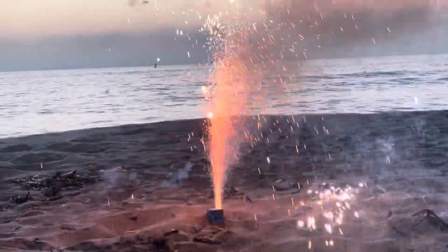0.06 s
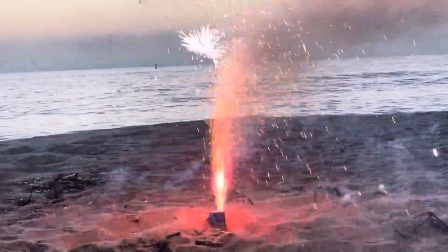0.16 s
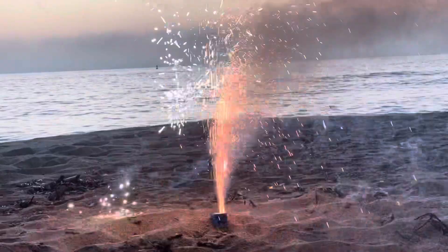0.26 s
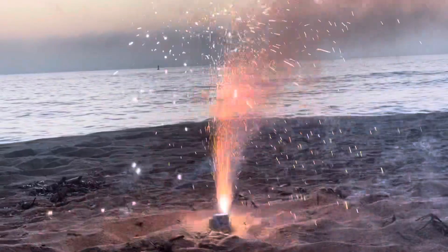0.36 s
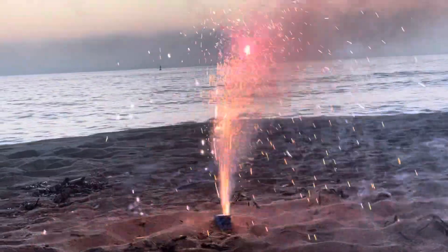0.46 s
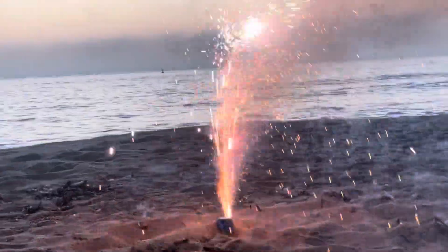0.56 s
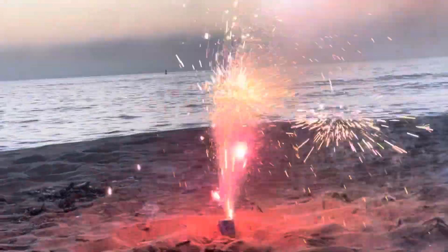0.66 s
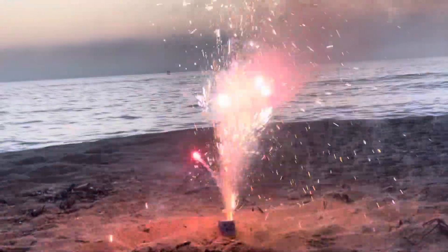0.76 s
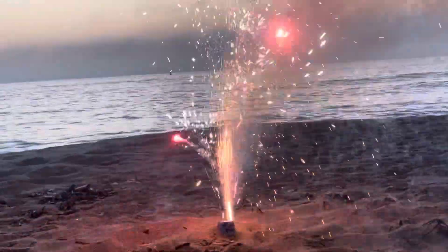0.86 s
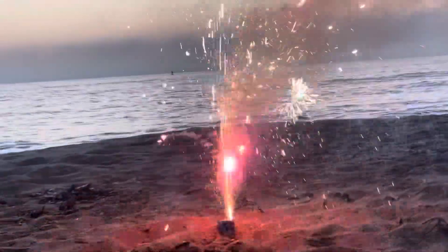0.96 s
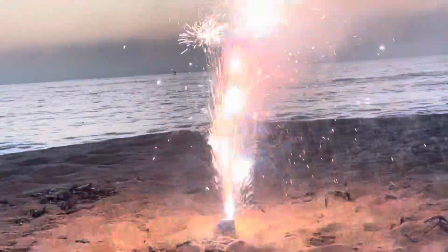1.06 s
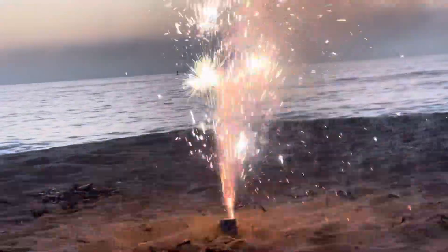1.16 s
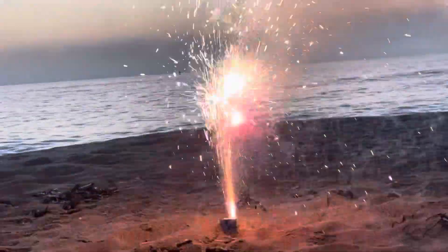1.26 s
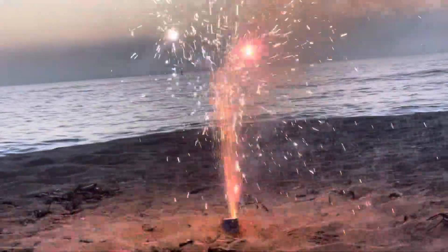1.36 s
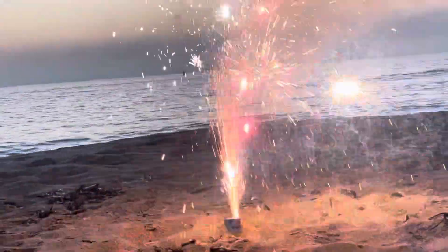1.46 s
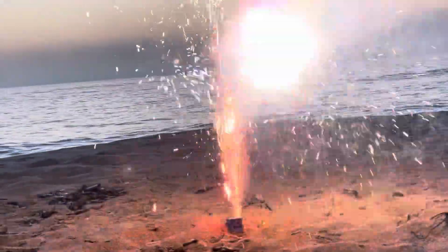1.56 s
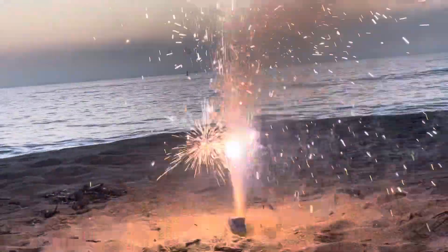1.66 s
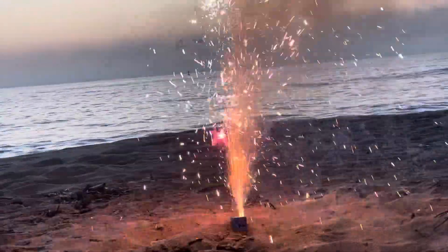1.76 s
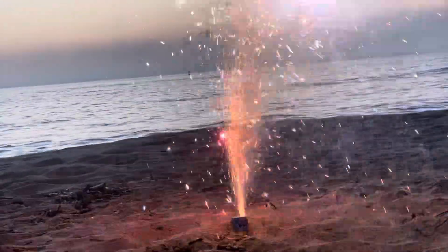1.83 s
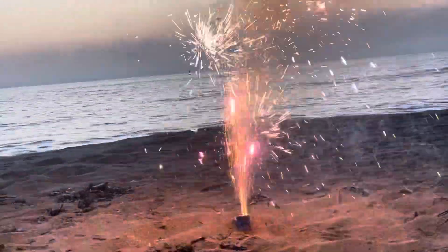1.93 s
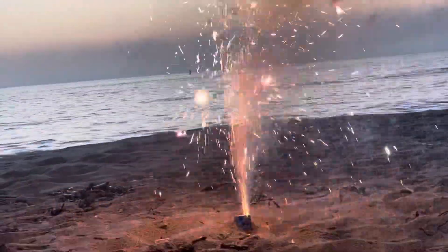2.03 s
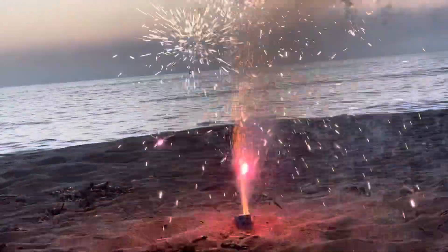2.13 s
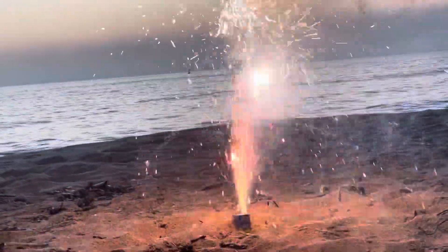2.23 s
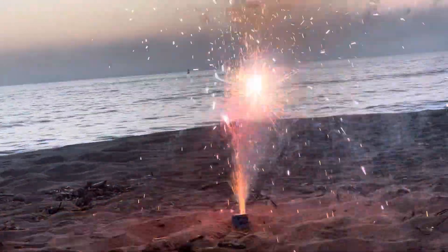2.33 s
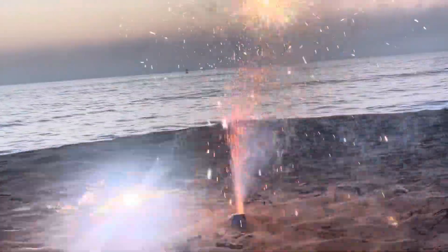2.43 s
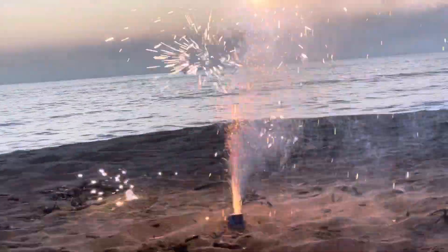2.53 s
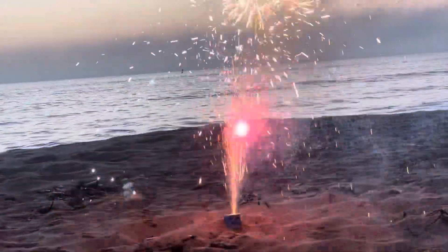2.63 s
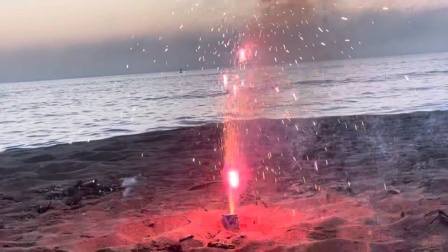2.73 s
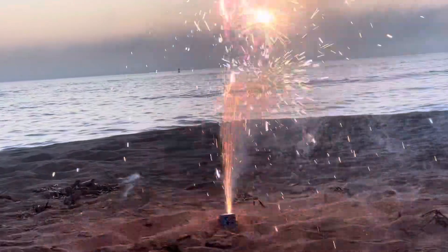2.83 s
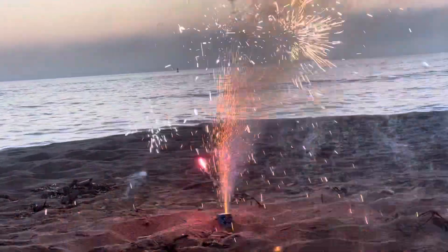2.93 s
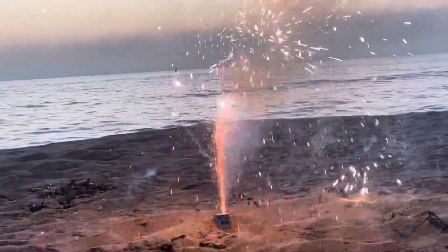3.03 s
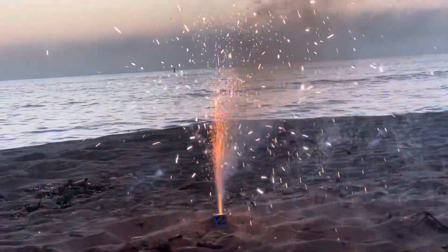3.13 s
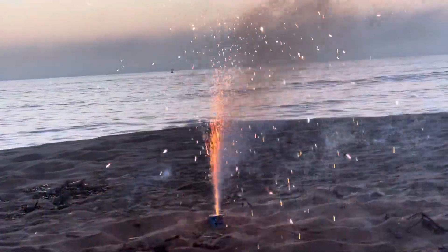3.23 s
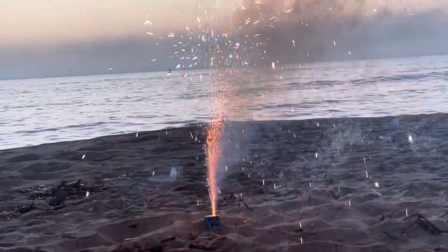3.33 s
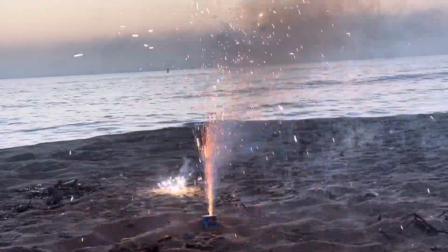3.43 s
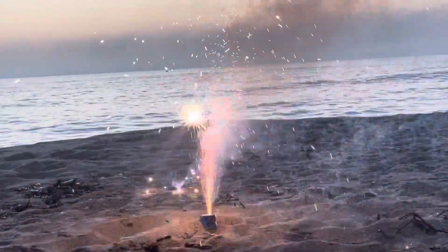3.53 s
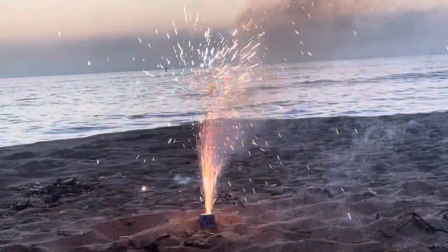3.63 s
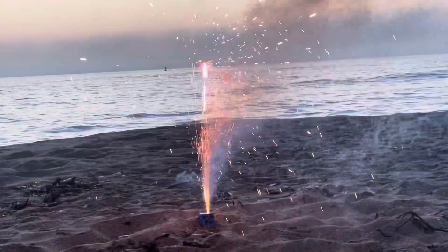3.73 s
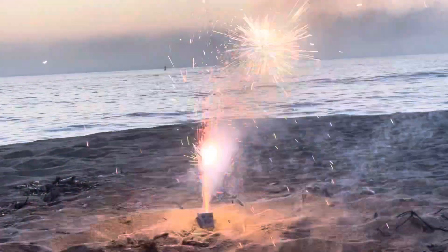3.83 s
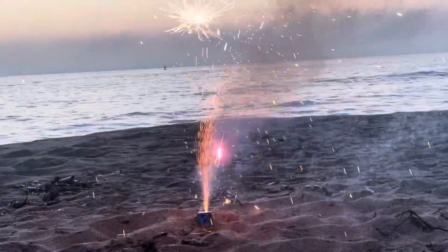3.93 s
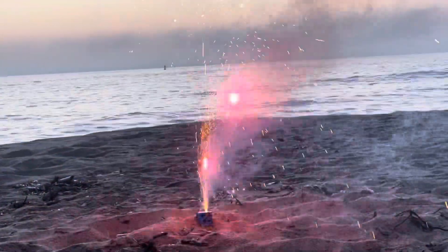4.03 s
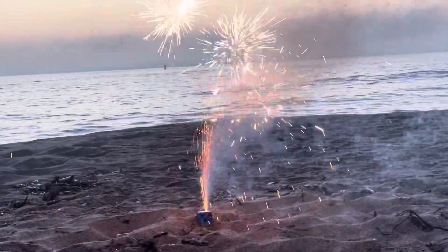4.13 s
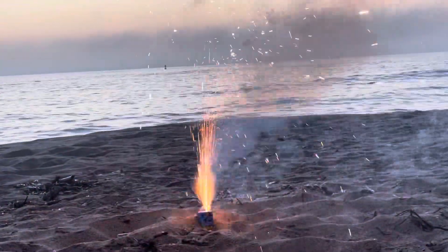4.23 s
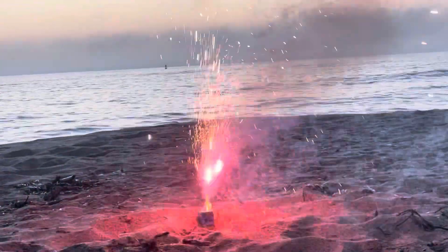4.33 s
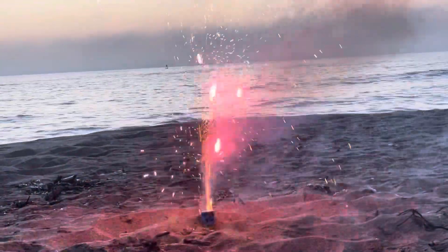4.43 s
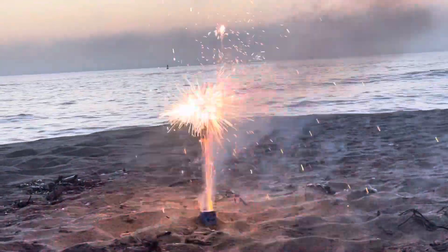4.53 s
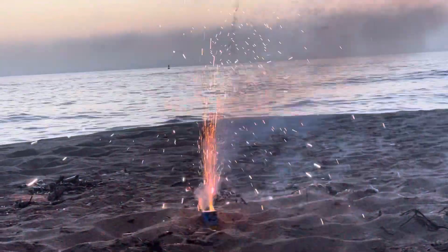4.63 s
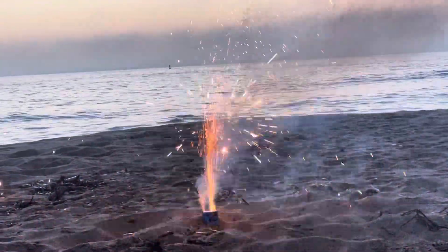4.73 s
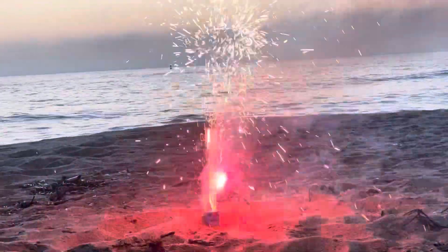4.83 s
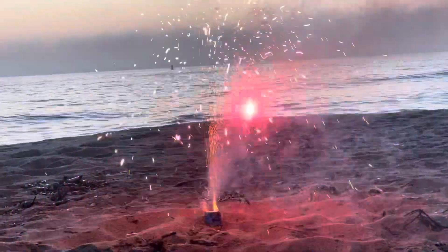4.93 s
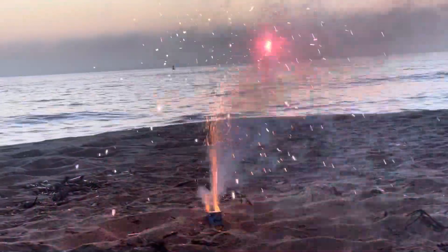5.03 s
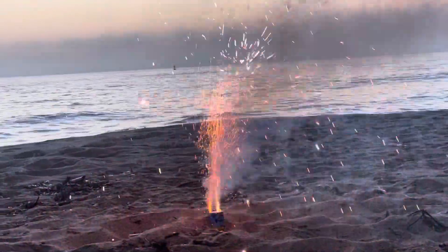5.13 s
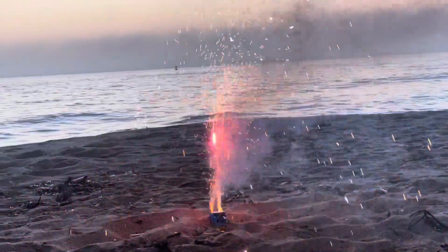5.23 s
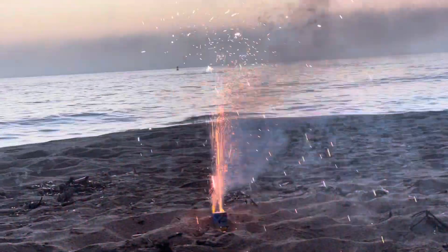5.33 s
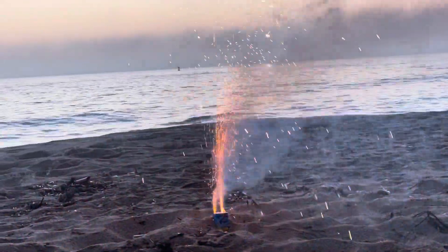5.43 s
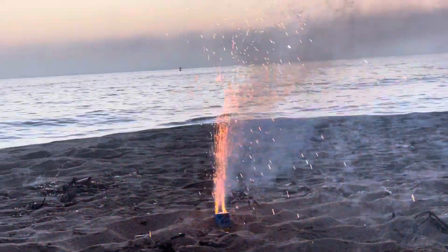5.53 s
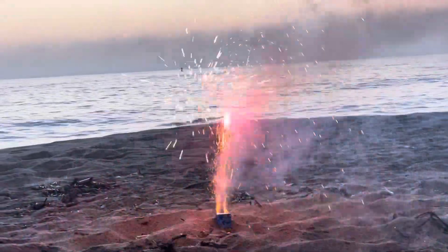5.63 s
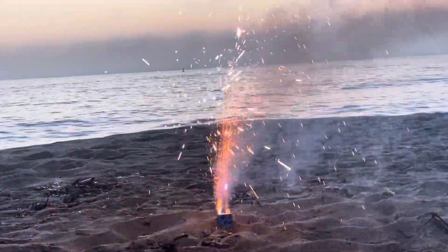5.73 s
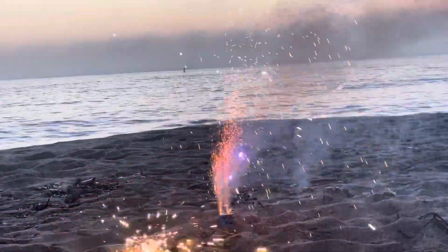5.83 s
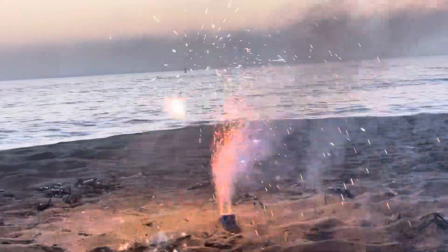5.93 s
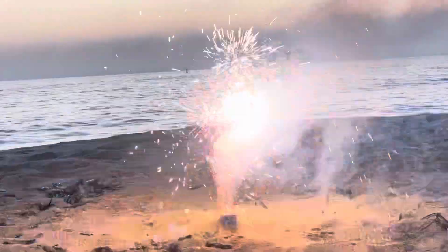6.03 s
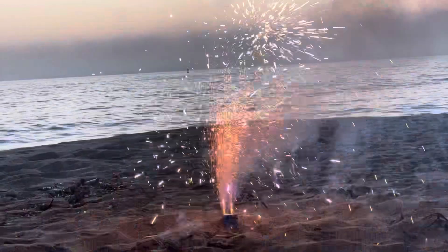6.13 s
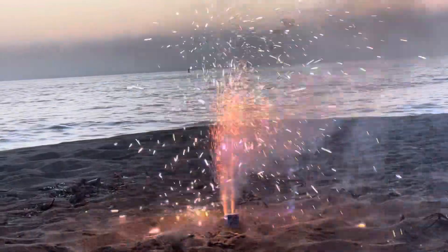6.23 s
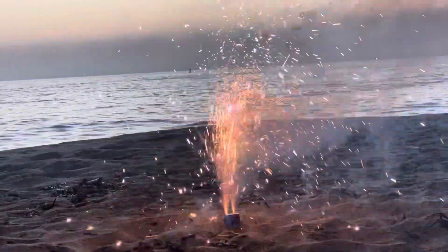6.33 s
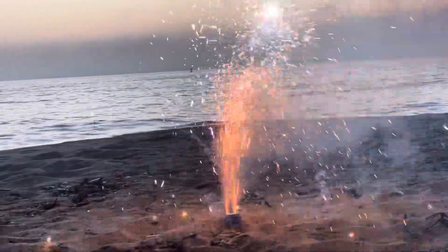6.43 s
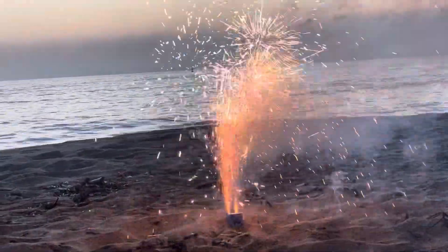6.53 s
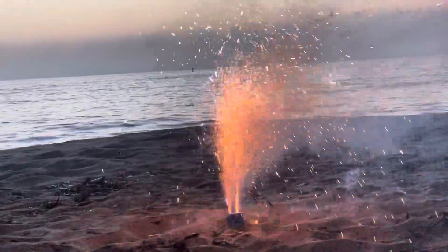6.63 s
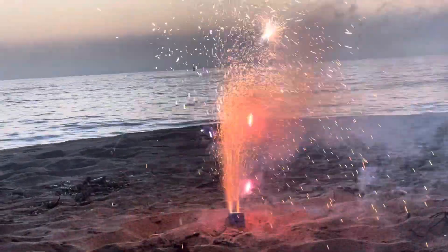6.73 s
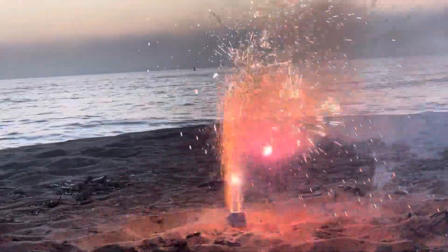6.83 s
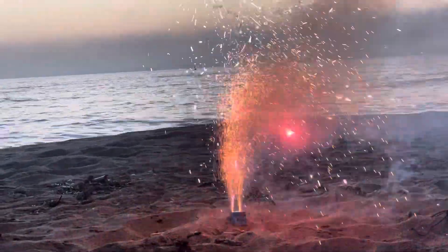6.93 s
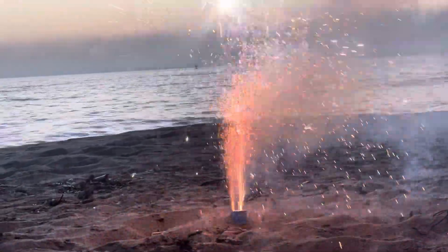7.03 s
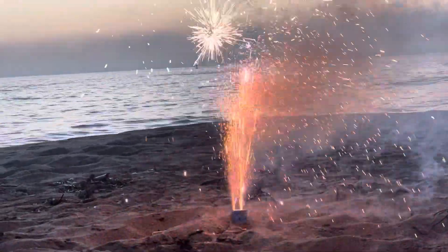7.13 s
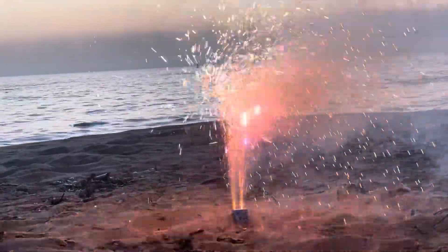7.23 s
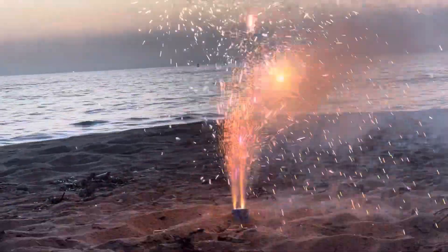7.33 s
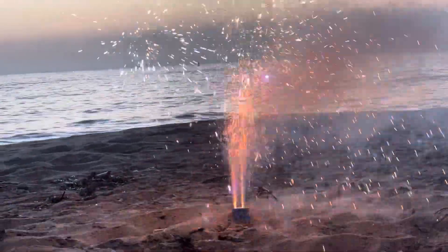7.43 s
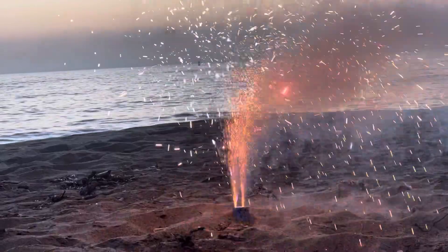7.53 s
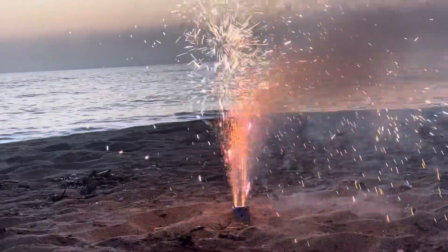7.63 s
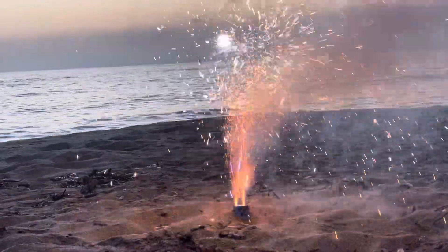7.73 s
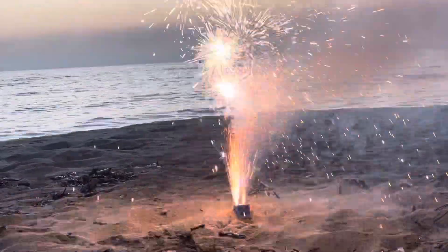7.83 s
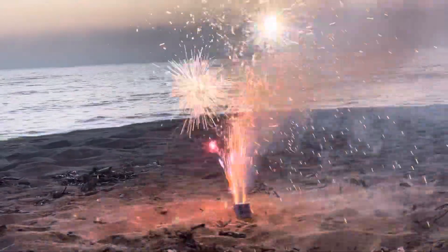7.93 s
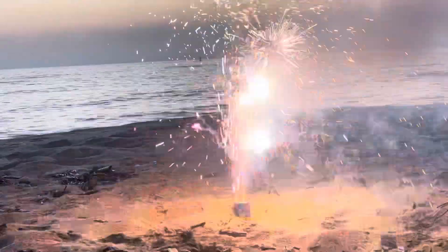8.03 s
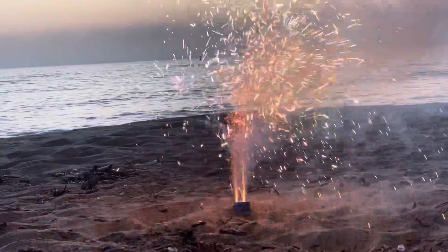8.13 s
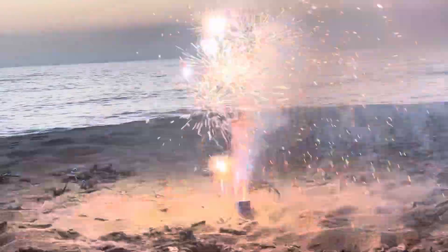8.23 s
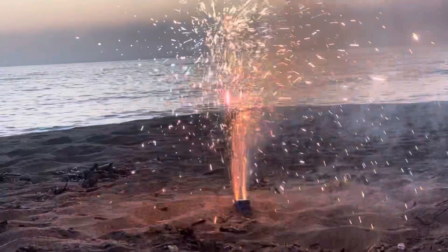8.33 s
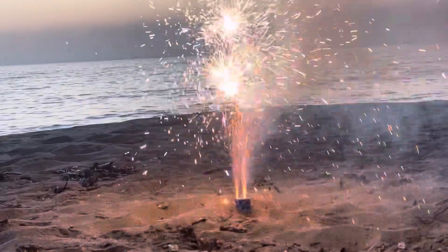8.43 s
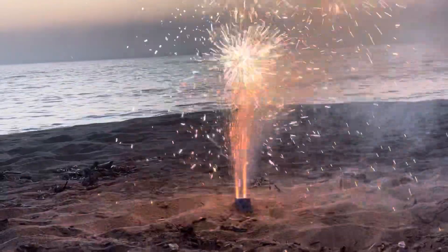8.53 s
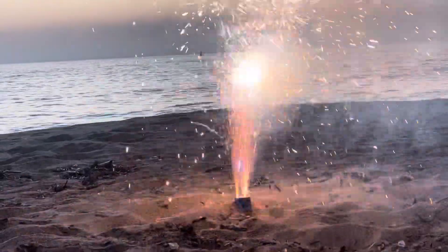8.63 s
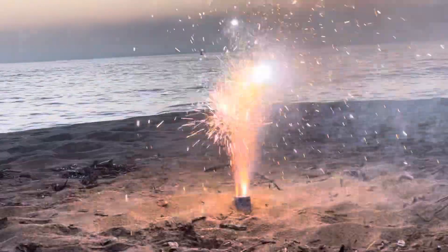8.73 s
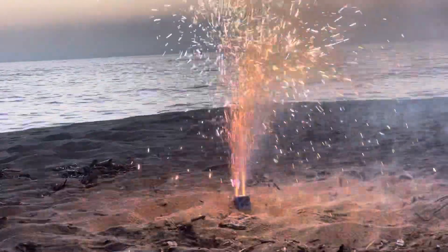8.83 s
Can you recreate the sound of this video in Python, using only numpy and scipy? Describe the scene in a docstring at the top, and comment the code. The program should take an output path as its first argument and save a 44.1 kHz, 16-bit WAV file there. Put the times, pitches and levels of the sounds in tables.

```python
"""A small fountain firework: a turbulent gas jet hisses, burning grains sizzle and spit, and the tube hoots.
Stars burst in the plume as volleys of fragments, cracks and thumps, sparse at first, thick and loud at the end.
The flame is low-frequency noise, a rumble and a soft rush with puffs at its flares and a fierce first surge.
Each star and hard crack echoes off the sand. Two microphone ports hear the sources with a phase difference.
A lumpy gust buffets the ports at the start, and the breeze after it dies away."""
import sys
import numpy as np
from scipy import signal
from scipy.fft import rfft, irfft, next_fast_len
from scipy.io import wavfile
from scipy.ndimage import uniform_filter1d

SR = 44100
rng = np.random.default_rng(int(sys.argv[2]) if len(sys.argv) > 2 else 0)


def inscribe(sig):
    """Save sig as 16-bit PCM at rate SR to the path in sys.argv[1].

    A 1-D sig is mono; a 2-D sig holds one channel per row.
    Samples are clipped to [-1, 1] before scaling.
    """
    pcm = np.round(np.clip(np.atleast_2d(sig).T, -1, 1) * 32767)
    wavfile.write(sys.argv[1], SR, pcm.astype(np.int16))


N = 391166
PAIR = (2, N)   # every source is a pair of signals: one common to both ports, one that sets them apart
TIME = np.arange(N) / SR   # s
SIZE = next_fast_len(N + 8192, real=True)   # transform length, padded so that filter tails do not wrap
HZ = np.maximum(np.arange(SIZE // 2 + 1) * SR / SIZE, 1)

# spectrum of cracks, weak in the bass and strong above 850 Hz: (frequency [Hz], relative density [dB])
CRACK_COLOUR = [(100, -13), (330, -17), (550, -13), (850, 0.5), (1400, -0.5), (2200, 0.5), (5000, 6.5),
                (8500, 3), (12500, 6.5), (15700, -4)]
# spectrum of star fragments and fine spits: (frequency [Hz], relative density [dB])
FIZZ_COLOUR = [(100, -17.5), (330, -10), (550, -11), (850, 0), (1400, -4), (2200, 0), (5000, 0.5),
               (8500, 1.5), (12500, -1.5), (15700, -8.5)]
# spectrum of the tube's hollow sound: (frequency [Hz], relative density [dB])
HOLLOW_COLOUR = [(520, -22), (740, -4.5), (920, -3.5), (1250, -7), (2200, -2.5), (4000, -39)]
# spectrum of the flame's rumble and of wind: (frequency [Hz], relative density [dB])
RUMBLE_COLOUR = [(22, -41), (36, -17), (52, 2.5), (110, 4), (160, -0.5), (230, -11), (400, -17.5),
                 (800, -52)]
MIDDLING_MS, MIDDLING_DB = 8, -14   # length and energy of a middling star
CRACK_RING_MS = 0.3   # decay time of a crack
SAND_ECHO_DB = -15   # echo off the sand, against the direct sound


def from_db(db):
    """Decibels to amplitude gain: a factor of ten for every 20 dB."""
    return 10 ** (np.asarray(db) / 20)


def over_hz(points):
    """A table joined by straight lines over log frequency."""
    hz, value = np.transpose(points)
    return np.interp(np.log(HZ), np.log(hz), value)


def colour(x, spectrum):
    """Minimum-phase filtering: the folded cepstrum makes it causal; the power of white noise is kept."""
    gain = from_db(over_hz(spectrum))
    cepstrum = irfft(np.log(gain / np.sqrt(np.mean(gain ** 2))), SIZE)
    cepstrum[1:SIZE // 2] *= 2
    cepstrum[SIZE // 2 + 1:] = 0
    response = np.exp(rfft(cepstrum))
    return irfft(rfft(x, SIZE) * response, SIZE)[..., :N]


def noise(spectrum):
    """Turbulence as coloured Gaussian noise with an rms of about 1."""
    return colour(rng.standard_normal(PAIR), spectrum)


def drift(rate):
    """Slow random modulation: low-passed noise of spread 1 that changes about rate times a second."""
    lowpass = 1 / (1 + (HZ / rate) ** 2)
    slow = irfft(rfft(rng.standard_normal(SIZE)) * lowpass, SIZE)[:N]
    return slow / slow.std()


def grains(per_s, spread_db):
    """Shot noise: tiny snaps of uneven size and either sign at random moments; rms 1."""
    size_db = spread_db * np.clip(rng.standard_normal(PAIR), -2, 2)
    sizes = from_db(size_db) * rng.choice([-1, 1], PAIR)
    snaps = sizes * (rng.random(PAIR) < per_s / SR)
    return snaps / snaps.std()


def swells(rows, rise_ms, fall_ms):
    """Exponential envelopes that rise to each (time [s], peak level [dB]) and die away."""
    swell = np.zeros(N)
    for s, level_db in rows:
        # a swell that peaks before 0.2 s adds nothing: its slice is empty
        near = slice(int((s - .2) * SR), int((s + .8) * SR))
        ms = (TIME[near] - s) * 1000
        swell[near] += from_db(level_db) * np.exp(np.minimum(ms / rise_ms, -ms / fall_ms))
    return swell


def burn_level(mean_db, per_thrust, per_flame):
    """Linear law in dB: a sound follows thrust and flame [dB per dB] about its level at the mean burn."""
    # thrust of the jet, which counts by its departure from the mean: (time [s], level [dB])
    thrust_rows = [(0.0, -30), (0.44, -32.5), (0.61, -28.5), (0.75, -30.5), (0.93, -26.7), (1.89, -28),
                   (2.36, -36), (2.81, -33.5), (3.2, -40.5), (3.56, -36), (5.51, -37.5), (5.81, -42.5),
                   (6.05, -37.5), (7.3, -32.5), (7.54, -35), (7.84, -33), (8.35, -35.5), (8.44, -34),
                   (8.87, -31.5)]
    # size of the flame, which counts by its departure from the mean: (time [s], level [dB])
    flame_rows = [(0.0, -43.5), (0.33, -45), (0.39, -50.5), (1.23, -48), (2.33, -52), (4.05, -52.5),
                  (4.35, -46.5), (4.94, -53.5), (5.54, -53), (6.26, -47.5), (6.38, -36.5), (7.0, -47.5),
                  (7.72, -45), (7.84, -39), (8.87, -42.5)]
    thrust = np.interp(TIME, *np.transpose(thrust_rows))
    flame = np.interp(TIME, *np.transpose(flame_rows))
    return mean_db + per_thrust * (thrust - thrust.mean()) + per_flame * (flame - flame.mean())


def jet(hiss_db, sizzle_db, hollow_db):
    """Jet noise: turbulent hiss, hollow tube sound and sizzling grains share the flutter of an uneven burn."""
    # spectrum of the gas: (frequency [Hz], relative density [dB])
    hiss_colour = [(500, -13.5), (1400, -11), (2000, -4), (3600, 4.5), (6200, 4.5), (7300, 1),
                   (9000, -18.5), (15700, -34)]
    # spectrum of the burning grains: (frequency [Hz], relative density [dB])
    sizzle_colour = [(700, -23), (2000, -6), (5000, 6), (9000, -1), (12500, 6), (15700, -12)]
    # the burn is more uneven when the jet is strong
    unevenness_db = 1.24 + .05 * (hiss_db - hiss_db.mean())
    flutter_db = unevenness_db * drift(rate=70)
    gas = noise(hiss_colour) * from_db(hiss_db + flutter_db)
    tube = noise(HOLLOW_COLOUR) * from_db(hollow_db + flutter_db)
    burning = grains(per_s=9000, spread_db=2.5)
    sparks = burning * from_db(sizzle_db + flutter_db)
    return gas + tube + colour(sparks, sizzle_colour)


def hoots():
    """Tube resonance: noise in a narrow band swells as the jet blows the tube's own breathy note."""
    # swells of the note: (time [s], peak level [dB])
    hoot_rows = [(1.03, -41.5), (2.0, -49)]
    # spectrum of the note: (frequency [Hz], relative density [dB])
    note_colour = [(600, -39), (830, -8), (900, -1), (1000, -6), (1400, -40)]
    return swells(hoot_rows, rise_ms=53, fall_ms=170) * noise(note_colour)


def spits(level_db, per_s, fall_ms, spectrum):
    """Random impulses excite an exponential decay: each clump is a short noise burst of uneven size."""
    sizes = from_db(rng.uniform(2, 13, N))
    starts = (rng.random(N) < per_s / SR) * sizes
    decay = np.exp(-1000 / (fall_ms * SR))
    dying = signal.lfilter([1], [1, -decay], starts + 1e-18)   # the tiny offset keeps silence nonzero
    return colour(dying * from_db(level_db) * rng.standard_normal(PAIR), spectrum)


def sputter(sizzle_db):
    """Bursts scale with the clump: fine ones spit brightly in the plume, coarse ones pop dully in the tube."""
    fine = spits(sizzle_db, per_s=80, fall_ms=1.3, spectrum=FIZZ_COLOUR)
    coarse = spits(sizzle_db - 9, per_s=24, fall_ms=4.5, spectrum=HOLLOW_COLOUR)
    return fine + coarse


def around(s):
    """The samples near a burst, and their time after it in ms."""
    near = slice(max(int((s - .03) * SR), 0), int((s + .1) * SR))
    return near, (TIME[near] - s) * 1000


def star_crack(ms, ring_ms):
    """Impulsive source: an abrupt, exponentially dying noise spike with the energy of 0 dB over one ms."""
    spike = rng.standard_normal((2, len(ms))) * np.exp(-abs(ms) / ring_ms) * (ms > 0)
    unit_energy = spike / np.linalg.norm(spike, axis=1, keepdims=True)
    return unit_energy * np.sqrt(SR / 1000)


def star_volley(ms, length_ms, rise_ms, fall_ms):
    """Energy conservation: attack, hold and release, where a longer volley spreads its energy thinner."""
    early, late = np.maximum(-ms, 0), np.maximum(ms - length_ms, 0)
    return np.exp(-early / rise_ms - late / fall_ms) / np.sqrt(length_ms + 1)


def star_colour(energy_db):
    """Random echo lag [ms] and dullness (a filter pole); big stars snap more brightly."""
    lag_ms, coarse = rng.uniform([.7, -1], [3.6, 1])
    dullness = -0.01 * (energy_db - MIDDLING_DB) + 0.11 * coarse
    return lag_ms, np.clip(dullness, -.5, .5)


def star_tone(x, lag_ms, dullness):
    """Reflection and one-pole filtering: a star's height sets its echo's lag; coarser stars sound duller."""
    lag, gain = int(lag_ms * SR / 1000), from_db(SAND_ECHO_DB)
    echoed = (x + gain * np.roll(x, lag, axis=-1)) / np.hypot(1, gain)
    return signal.lfilter([np.sqrt(1 - dullness ** 2)], [1, -dullness], echoed)


def star_body(x, body_db):
    """Band emphasis: a full-bodied star is strong in the low mids, a thin one weak."""
    low_mids = signal.butter(1, [450, 2500], "band", fs=SR, output="sos")
    return x + (from_db(body_db) - 1) * signal.sosfilt(low_mids, x)


def small_stars(count):
    """Random events: rows like those of the loud stars, with more energy when the burn is fierce."""
    when, size, length = rng.uniform([0, -1, .5], [N / SR - .05, 1, 2], (count, 3)).T
    burn_db = burn_level(mean_db=-27.5, per_thrust=0.5, per_flame=0.49)
    energy_db = burn_db[(when * SR).astype(int)] + 4.5 * size
    return np.c_[when, energy_db, MIDDLING_MS * length, np.zeros(count)]


def stars(ember_db, ember_ms):
    """Superposed impulses: each star is a volley of fragments, a soft crack, a gas thump and trailing embers."""
    # loud stars: (time [s], energy over one ms [dB], volley length, at least 1 [ms], low-mid body [dB])
    star_rows = [(0.0652, -23, 7.9, 2), (0.0969, -27, 4.5, 2), (0.1827, -23.5, 10, 5.5),
                 (0.2728, -18, 18, 5), (0.6312, -21, 24, -3.0), (0.687, -22, 9.5, 2),
                 (1.2013, -18.5, 14.0, 3), (1.2652, -15.5, 8, 0), (1.3105, -19, 13, 0),
                 (1.4242, -15, 34, 1.5), (1.542, -20, 12, 0), (1.648, -20.5, 6, -2.5),
                 (2.0491, -19.5, 18, 1), (2.0973, -23, 4, -3), (2.1597, -23, 7.3, -8),
                 (2.1918, -23, 15, 2.5), (2.2336, -22.5, 20, 4), (2.3191, -19.5, 9.0, -5),
                 (2.365, -25, 6, 0), (2.4363, -21, 13.0, -1), (2.502, -24, 9.5, -8),
                 (2.5498, -18.5, 8.5, -5.0), (2.565, -22.5, 9.1, -1), (2.6009, -24.5, 8.3, -3),
                 (2.677, -33, 2, 12), (2.7361, -25, 7, 1), (2.7662, -24.5, 4.9, 2), (2.7746, -22, 7.5, 0),
                 (2.8565, -23.5, 9.3, -1.5), (2.8991, -22.5, 10.5, -4), (2.9839, -20, 12, 2),
                 (3.0157, -21.5, 8.0, 2), (3.0367, -22, 4.2, -3), (3.0516, -23.5, 12.4, -3),
                 (3.2689, -17.5, 8.7, -5), (3.3448, -19, 8.7, -11), (3.388, -20, 9.3, -3),
                 (3.493, -25.5, 3.7, -1.5), (3.5637, -23, 6.5, -3.5), (3.6, -21.0, 19.4, -3),
                 (3.8464, -18, 9.2, -3), (3.9489, -24, 9.2, -6), (4.1226, -24, 8.7, -4),
                 (4.1391, -24, 3.2, -2.5), (4.2469, -26, 8.5, 0), (4.2831, -24.5, 8.0, -2),
                 (4.4141, -26, 4.2, -2), (4.4738, -24, 3.8, -2), (4.5523, -23, 12, -4),
                 (4.7273, -21.5, 6.5, -5), (4.8047, -23, 4.0, -3.0), (4.8195, -18.5, 8.5, -2),
                 (4.8317, -18, 7.6, -2), (4.8777, -19, 11, -3), (5.128, -27, 4, 1), (5.2922, -27, 8.0, -3),
                 (5.6096, -27.5, 17, 0), (5.6291, -23, 2.7, 0), (5.6981, -24, 8.5, -7),
                 (5.7173, -23.5, 6.8, -4), (5.8062, -19.5, 8.7, -6.5), (5.9022, -26.5, 6.6, -2),
                 (5.9676, -24, 8.0, -2), (6.0031, -20.5, 1.3, -5), (6.007, -20.5, 5.5, -9),
                 (6.029, -22.5, 6.9, -3), (6.0576, -21, 5.2, -4.0), (6.0693, -24.5, 6.6, -1),
                 (6.1096, -20, 5.6, -4), (6.1205, -24.5, 7.0, 1), (6.1874, -20, 2.7, -2.0),
                 (6.2091, -18, 7.0, -5), (6.2224, -17.5, 3.5, -7), (6.3011, -21, 4.1, -1),
                 (6.3134, -23, 16.0, 0.0), (6.3947, -11, 4.8, -5), (6.418, -17, 7.3, -2),
                 (6.4575, -17.5, 3.5, -2), (6.4674, -13.5, 4.2, -3), (6.4911, -16, 5.1, -1),
                 (6.5159, -14, 14.4, -1), (6.5493, -14.5, 5.8, -4), (6.6769, -13, 8.3, -1.5),
                 (6.6974, -17, 2.8, 1), (6.7154, -21.5, 4.8, 4.5), (6.7959, -26, 2.5, 8.5),
                 (6.8495, -19.5, 12, 3.5), (6.8749, -19.5, 7, 3), (6.8861, -22, 9.3, -2),
                 (6.9334, -16, 3.0, -4), (6.9798, -25, 4.9, -2), (6.9891, -18.5, 3.2, 1.0),
                 (7.0481, -19.0, 4.6, 0), (7.0644, -9.5, 4.5, -0.5), (7.0752, -16.0, 4.5, -3.0),
                 (7.1257, -18, 6.5, -4), (7.1423, -13.5, 10.0, -1.0), (7.1924, -14, 5.6, 0.5),
                 (7.2039, -22, 4.5, -1.0), (7.2351, -12.5, 6.5, 0), (7.264, -15, 6.8, 2.5),
                 (7.3086, -18, 3.9, 3), (7.3188, -23.5, 3.6, 8), (7.3263, -13.5, 3.2, 0.0),
                 (7.3447, -14.5, 4, -1.0), (7.391, -19.5, 2.46, 3.5), (7.4101, -15, 10.0, 1.5),
                 (7.4719, -16, 5.5, 2), (7.499, -11, 6.8, 2), (7.5822, -18.5, 7.5, 4),
                 (7.5952, -11, 7.4, -3.5), (7.6318, -16.5, 9.1, 2.5), (7.6476, -12.5, 4.0, -3),
                 (7.6846, -13, 10.7, 2), (7.7295, -15, 8.7, 4.5), (7.7698, -16.5, 2.7, 3.5),
                 (7.7868, -16, 2.9, -3), (7.8011, -16, 3.2, -2.0), (7.814, -11.5, 5.3, 3.5),
                 (7.8328, -22, 3.4, 4), (7.84, -17.0, 5.4, 4), (7.8601, -12, 9.0, 2.5),
                 (7.8768, -19, 3.5, 1), (7.902, -16.5, 5.1, 5), (7.9324, -19, 7.5, 2),
                 (7.9553, -13.5, 7, 4), (7.9716, -13.5, 5, 0), (7.9963, -13, 6.2, 2),
                 (8.0523, -21.5, 2.2, 6), (8.0678, -17, 12, -1), (8.1095, -16.5, 10, 5.5),
                 (8.1234, -13.5, 5.6, -1.5), (8.1331, -12, 7.2, -1), (8.1633, -15.5, 2.4, -2.0),
                 (8.217, -20, 2.7, 5), (8.2458, -16, 11, 4), (8.2642, -9, 10.5, 0), (8.2856, -19, 6.2, 4),
                 (8.3194, -19, 5, 5), (8.3385, -17, 4.9, 3), (8.3878, -23, 6.6, 0.0), (8.4012, -12, 4, -1),
                 (8.408, -15, 5, 0), (8.4177, -18, 12, 1), (8.4496, -22.0, 2.5, -2.0), (8.462, -13, 6.3, 1),
                 (8.474, -23, 5.5, 3.0), (8.5182, -11, 11.5, 0.5), (8.538, -14.5, 8.0, 2.5),
                 (8.601, -19.5, 2.1, 1), (8.608, -21, 8.9, -3), (8.6427, -14.5, 5.8, 2.5),
                 (8.6951, -19, 3.7, -1), (8.7494, -12.5, 7.0, 1), (8.7671, -10, 19, 3),
                 (8.7905, -14, 7.7, 6.5), (8.8031, -17.5, 6.2, 2), (8.8268, -13, 11.5, -3)]
    # spectrum of the push of gas from a burst: (frequency [Hz], relative density [dB])
    thump_colour = [(40, -19), (130, 4), (360, 0), (540, -10), (1500, -35)]
    crack_base_db, volley_db, thump_base_db = -6, 1.53, -24   # against the star's energy
    crack_loss_db, crack_spread_db = 2, 4   # loss per doubling of length: slow stars crack more softly
    thump_ms = 1.2   # decay time
    heavy_from_s, heavy_db = 7.76, 9.5   # the last stars of the charge thump much harder
    cracks, fizz, thumps = np.zeros(PAIR), np.zeros(PAIR), np.zeros(PAIR)
    fragments = grains(per_s=12000, spread_db=6.0)
    embers = grains(per_s=1100, spread_db=3.5)
    fragments = fragments * from_db(2.5 * drift(rate=530) - 0.55)   # the fragments go off in clusters
    for s, energy_db, length_ms, body_db in [*star_rows, *small_stars(count=28)]:
        near, ms = around(s)
        length_ms, tone = max(length_ms, 1), star_colour(energy_db)
        hard, place = rng.uniform([-1, 0], [1, .9])

        crack_db = crack_base_db - crack_loss_db * np.log2(length_ms / MIDDLING_MS) + crack_spread_db * hard
        crack = star_crack(ms - place ** 2 * length_ms, CRACK_RING_MS)   # squared: mostly early
        cracks[:, near] += from_db(energy_db + crack_db) * star_body(star_tone(crack, *tone), body_db)

        volley = fragments[:, near] * star_volley(ms, length_ms, rise_ms=0.81, fall_ms=0.93)
        trail_shape = star_volley(ms, length_ms, rise_ms=0.45, fall_ms=ember_ms)
        trail = embers[:, near] * from_db(ember_db) * trail_shape
        fizz[:, near] += from_db(energy_db + volley_db) * star_body(star_tone(volley + trail, *tone), body_db)

        thump_db = thump_base_db + body_db + heavy_db * (s > heavy_from_s)
        thump = star_crack(ms - place * length_ms / 2, thump_ms)
        thumps[:, near] += from_db(energy_db + thump_db) * thump
    return colour(cracks, CRACK_COLOUR) + colour(fizz, FIZZ_COLOUR) + colour(thumps, thump_colour)


def shock(ms):
    """Shock wave: a steep pressure front, then a ragged tail; about the energy of 0 dB over one ms."""
    front = 1   # against the tail
    wave = star_crack(ms, CRACK_RING_MS)
    wave[:, np.argmax(ms > 0)] = front * np.sqrt(SR / 1000)
    return wave / np.hypot(1, front)


def hard_cracks():
    """Shock fronts of stars that split all at once, pressure spikes apart from the volleys."""
    # hard cracks: (time [s], energy over one ms [dB])
    crack_rows = [(0.6943, -23), (2.8597, -22), (2.9843, -13), (3.0516, -20.5), (3.277, -21), (3.8465, -18),
                  (4.4168, -23), (4.5749, -22), (5.6982, -22.5), (6.1876, -13.5), (6.2225, -10),
                  (6.4934, -15), (6.5512, -9), (6.6812, -13), (6.6975, -14), (6.7639, -18), (6.858, -14),
                  (6.9335, -10.5), (6.9819, -11.5), (7.0768, -12), (7.1422, -14), (7.2658, -13),
                  (7.3089, -12), (7.391, -16), (7.7699, -22), (7.787, -17), (7.8013, -15), (7.8162, -15),
                  (7.8417, -16), (7.8645, -13), (8.1242, -15), (8.139, -9), (8.1632, -13), (8.2173, -17),
                  (8.2706, -10), (8.2723, -10), (8.4217, -16), (8.4497, -16), (8.462, -11), (8.4683, -15),
                  (8.486, -22), (8.6008, -15.5), (8.6446, -14), (8.7672, -12)]
    cracks = np.zeros(PAIR)
    for s, energy_db in crack_rows:
        near, ms = around(s)
        cracks[:, near] += from_db(energy_db) * star_tone(shock(ms), *star_colour(energy_db))
    return colour(cracks, CRACK_COLOUR)


def roar(rumble_db, rush_db):
    """Combustion noise: a lumpy rumble of the flame under a soft rush that shares its lumps."""
    # spectrum of the rush: (frequency [Hz], relative density [dB])
    rush_colour = [(100, -12.5), (210, -2), (320, 1.5), (540, -3.5), (750, -3), (1300, -5.5), (4000, -16)]
    lumps = drift(rate=40)
    rumble = noise(RUMBLE_COLOUR) * from_db(rumble_db + 2.9 * lumps)
    rush = noise(rush_colour) * from_db(rush_db + 1.36 * lumps)
    return rumble + rush


def puffs():
    """Volume displacement: a flare pushes out a short, soft thud of hot gas, low noise in an envelope."""
    # strong flares of the flame: (time [s], peak level [dB])
    flare_rows = [(0.163, -32), (1.262, -37), (2.68, -41), (4.423, -35.5), (4.592, -35.5), (5.867, -38.5),
                  (6.011, -37), (6.083, -33.5), (6.436, -29.5), (6.482, -33), (6.563, -31), (6.72, -31.5),
                  (6.81, -33), (7.086, -34), (7.327, -30), (7.508, -28.5), (7.656, -33), (7.78, -29),
                  (7.868, -27), (7.967, -27), (8.023, -28), (8.141, -28.5), (8.28, -26), (8.355, -32),
                  (8.42, -26), (8.475, -31), (8.553, -31), (8.655, -30.5), (8.81, -28)]
    # spectrum of a flare's thud: (frequency [Hz], relative density [dB])
    thud_colour = [(30, -29), (65, -3), (112, 4.5), (220, -6), (340, -14), (520, -22.5), (900, -19),
                   (1600, -35)]
    gas = noise(thud_colour)
    even = gas / np.sqrt(uniform_filter1d(gas ** 2, size=700))   # levelled, so each thud keeps its peak
    return swells(flare_rows, rise_ms=8, fall_ms=15) * even


def surge(stop_s, fade_s, surge_db):
    """Combustion noise of the fierce first stage of the charge, which roars until it burns out."""
    burning = np.clip((stop_s - TIME) / fade_s, 0, 1)
    # (frequency [Hz], relative density [dB])
    body = noise([(40, -12), (130, -5), (290, 0.0), (500, -6.5), (780, -3.5), (1100, -12), (2500, -22.0)])
    return burning * from_db(surge_db + 3.5 * drift(rate=41)) * body


def ports(pair):
    """Phase difference and decorrelation: the ports share one signal out of phase; a second one widens it."""
    # phase by which the left port leads: (frequency [Hz], phase [rad])
    phase_rows = [(400, 0), (550, .35), (750, .25), (1050, .6), (1450, 0), (2600, 0), (3300, .45),
                  (5250, .5), (5750, -1.5), (6700, -.75), (7600, -2.4), (8000, -2.45), (11000, -4.6),
                  (13000, -6.28)]
    # stereo width: level of the decorrelated sound against the direct: (frequency [Hz], level [dB])
    width_rows = [(300, -28), (600, -16), (1200, -14), (1500, -30), (2300, -30), (3200, -14), (7500, -10),
                  (8700, -19), (11000, -9), (14000, -19)]
    direct, decorrelated = rfft(pair, SIZE)
    share, sign = from_db(over_hz(width_rows)), np.array([[1], [-1]])
    heard = (direct + sign * share * decorrelated) / np.hypot(1, share)
    return irfft(heard * np.exp(.5j * sign * over_hz(phase_rows)), SIZE)[:, :N]


def wind():
    """Turbulent pressure, uncorrelated between the ports: one lumpy gust, then a dying breeze."""
    gust_db, gust_end_s, gust_fall_s = -42, 0.39, .12   # the gust holds, then drops
    breeze_db, breeze_fall_db_per_s = -54.5, 5.5
    gust = from_db(gust_db + 2 * drift(rate=20)) * np.clip((gust_end_s - TIME) / gust_fall_s, 0, 1)
    breeze = from_db(breeze_db - breeze_fall_db_per_s * TIME)
    return (gust + breeze) * noise(RUMBLE_COLOUR)


def scene():
    """Linear superposition of plume, crackle and flame at the ports, with wind added at each port."""
    hiss_db = burn_level(mean_db=-37.5, per_thrust=0.89, per_flame=-0.059)
    sizzle_db = burn_level(mean_db=-44.5, per_thrust=1.55, per_flame=-0.16)
    hollow_db = burn_level(mean_db=-50.5, per_thrust=0.73, per_flame=0.19)
    rumble_db = burn_level(mean_db=-47.5, per_thrust=0, per_flame=0.95)
    rush_db = burn_level(mean_db=-47, per_thrust=0.24, per_flame=0.14)
    # from 6.25 s, over 0.29 s, the tube burns empty and sounds 6 dB fuller
    empty = np.clip((TIME - 6.25) / 0.29, 0, 1)
    plume = jet(hiss_db, sizzle_db, hollow_db + 6 * empty) + hoots()
    crackle = sputter(sizzle_db) + stars(ember_db=-11.5, ember_ms=11.7) + hard_cracks()
    flame = roar(rumble_db, rush_db) + puffs()
    flame += surge(stop_s=0.396, fade_s=0.046, surge_db=-39.0)
    return ports(plume + crackle + flame) + wind()


def record(dry):
    """Soft saturation rounds the tallest spikes; band-limiting cuts the deepest bass and the top."""
    rounded = .95 * np.tanh(dry / .95)
    bass_cut = signal.butter(4, 38, "high", fs=SR, output="sos")
    top_cut = signal.cheby2(16, 50, 16500, fs=SR, output="sos")
    return signal.sosfiltfilt(top_cut, signal.sosfilt(bass_cut, rounded))


dry = scene()
out = record(dry)
inscribe(out)
```